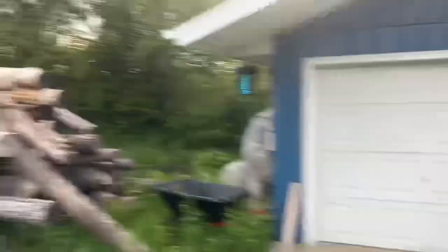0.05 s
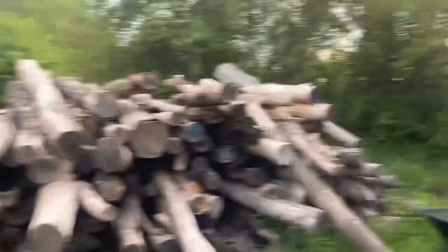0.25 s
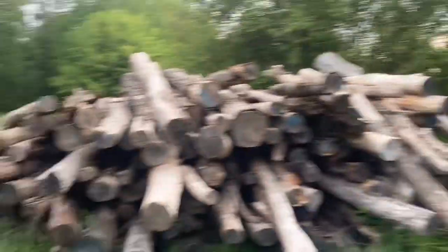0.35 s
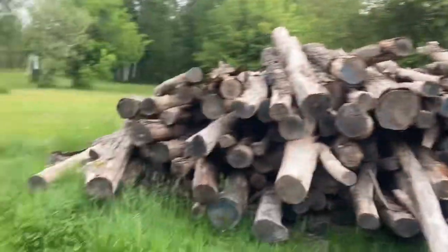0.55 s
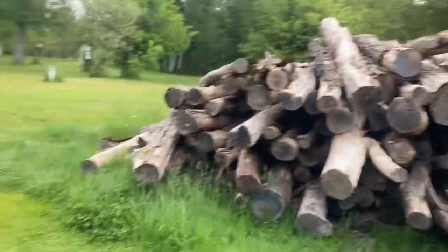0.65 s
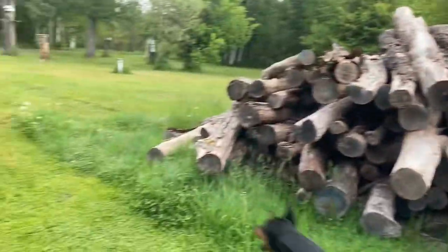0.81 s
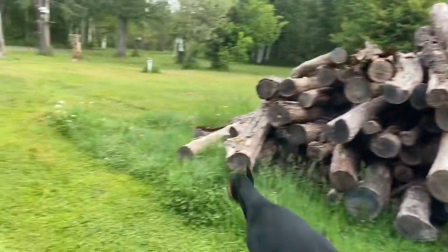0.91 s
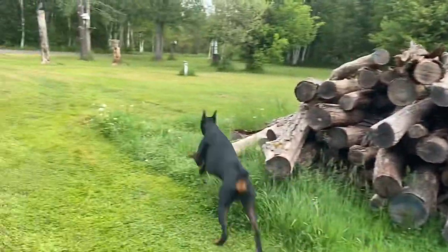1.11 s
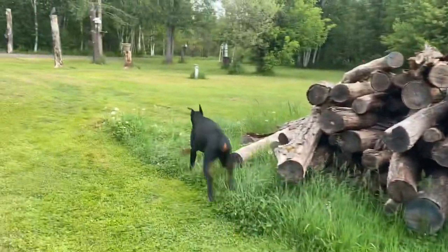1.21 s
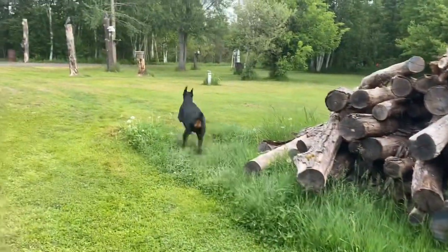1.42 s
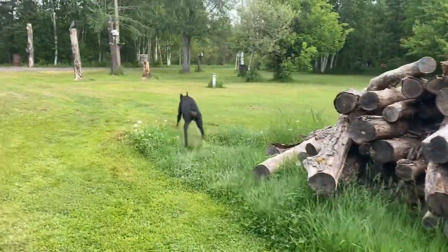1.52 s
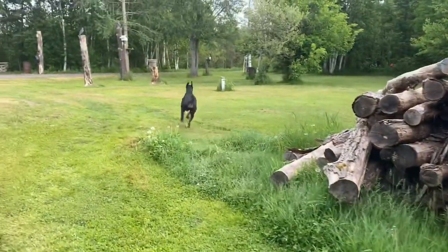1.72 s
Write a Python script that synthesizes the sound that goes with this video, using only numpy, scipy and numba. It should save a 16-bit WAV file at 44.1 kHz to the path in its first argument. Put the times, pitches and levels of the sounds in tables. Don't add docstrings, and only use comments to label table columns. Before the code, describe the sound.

A large dog's bark dominates: the faint, falling tail of an earlier one at 0-0.15 s, then one loud, raspy bark at 0.22-0.37 s, jumping up in pitch and dropping quickly, with a short wall and yard reflection. From 0.4 s, soft dull paw thuds, low landings, breath puffs and grass swishes, strongest near 0.9 s, fade by about 1.7 s over low wind rumble.

```python
import sys
import numpy as np
from scipy import signal
from scipy.fft import rfft, irfft, next_fast_len
from scipy.io import wavfile
from scipy.ndimage import uniform_filter1d
from numba import njit

SR = 44100
rng = np.random.default_rng(int(sys.argv[2]) if len(sys.argv) > 2 else 0)


def digitize_waveform(pressure):
    field = np.atleast_2d(pressure).T
    bounded = np.clip(field, -1, 1)
    quanta = np.round(bounded * 32767).astype(np.int16)
    wavfile.write(sys.argv[1], SR, quanta)


def volts(x):
    e = np.asarray(x, float) / 20
    return 10 ** e


N = 77175

# time_s, level_db, pitch_hz, chest_tone_db, mouth_resonance_hz
BARK_COURSE = [
    (.222, -32, 344.9, -39.5, 1790),
    (.236, -17.5, 371.2, -32.5, 1560),
    (.256, -14.5, 421.1, -36, 1583),
    (.272, -14.5, 416.9, -42.5, 1700),
    (.283, -17.5, 399.8, -48, 1684),
    (.292, -8.5, 364, -46, 1365),
    (.308, -17, 346.2, -40, 1380),
    (.332, -28.5, 273.4, -42, 1440),
    (.368, -53.5, 205, -49, 1442),
]
# centre_hz, width_hz, level_db
OPEN_THROAT = [(689, 193, 4.5), (1080, 300, -14), (1531, 90, -4.5), (1700, 174.2, -0.5), (2145, 390, -16.5)]
# centre_hz, width_hz, level_re_voice_db
BARK_RASP = [(400, 180, -12), (2050, 450, -24), (2900, 400, -38), (3900, 500, -47), (4750, 250, -33),
             (5700, 900, -41), (6850, 450, -38), (7900, 1100, -52)]


def bark():
    return voice(BARK_COURSE, OPEN_THROAT, rough=.2, teeth=BARK_RASP, rasp_db=7.0)


# time_s, level_db, pitch_hz, chest_tone_db, mouth_resonance_hz
EARLIER_COURSE = [
    (0.0, -38, 402.8, -35.5, 1020),
    (0.014, -37, 405.5, -34.5, 1100),
    (0.02, -42.5, 384, -45, 1100),
    (0.03, -40.5, 315, -49.5, 1150),
    (0.088, -44, 252.9, -40, 1170),
    (0.106, -52, 234.4, -57.5, 1160),
    (0.13, -54, 240, -64, 1190),
    (.2, -63.5, 242.5, -74.5, 1190),
]
# centre_hz, width_hz, level_db
CLOSING_THROAT = [(640, 110, 5.5), (990, 300, -1), (1540, 200, -9), (1160, 400, 0), (1850, 520, -14)]
# centre_hz, width_hz, level_re_voice_db
EARLIER_RASP_PEAKS = [(377, 60, -8.5), (2086, 440, -33.5), (3500, 840, -31), (4200, 500, -39.5),
                      (4816, 520, -36), (6200, 900, -42), (6700, 600, -39), (8500, 870, -45.5)]


def earlier_bark():
    return voice(EARLIER_COURSE, CLOSING_THROAT, rough=1.1, teeth=EARLIER_RASP_PEAKS, rasp_db=11.0)


# four corner times, time_s
DOUBLING_TIMES = (.231, .241, .281, .288)


def voice(course, throat, rough, teeth, rasp_db):
    jitter, muzzle_hz = .013, 2300
    weak_depth, weak_rest = .85, .08
    closing_tilt = .55
    rasp_slope = .73
    undertone_db = -10

    rows, t = np.array(course), np.arange(N) / SR
    db, hz, chest_db, mouth_hz = (np.interp(t, rows[:, 0], rows[:, k]) for k in range(1, 5))
    weak = weak_rest + (weak_depth - weak_rest) * np.interp(t, DOUBLING_TIMES, [0, 1, 1, 0])
    phase = np.pi * np.cumsum(hz * (1 + jitter * walk(150))) / SR

    k = np.arange(3, 30)[:, None]
    span = slice(0, int(.5 * SR))
    strength = np.where(k % 2, weak[span], 1)
    rolloff = 1 + (k * hz[span] / 2 / 2500) ** 8
    folds = np.zeros(N)
    folds[span] = (strength * np.cos(k * phase[span]) / rolloff).sum(0) / 4

    air = rng.standard_normal(N) * (1 + 0.21 * np.cos(phase))
    slack = np.clip(db.max() - 7 - db, 0, 30)
    drive = folds + rough * 2 * air * volts(slack)
    mouth = resonate(drive, throat[2:3], 0.94) + resonate(drive, throat[3:], mouth_hz / throat[3][0])
    x = resonate(drive, throat[:2], 0.99) + volts(-closing_tilt * slack) * mouth
    x = -signal.sosfilt(signal.butter(6, muzzle_hz, fs=SR, output="sos"), x)
    x /= np.sqrt(uniform_filter1d(x ** 2, 600) + 1e-9)

    rasp = volts(rasp_db + rasp_slope * db + 0.58 * walk(70)) * resonate(air, teeth, 0.95)
    chest = np.sin(2 * phase) + weak * volts(undertone_db) * np.sin(phase)
    x = x * volts(db) + np.sqrt(2) * volts(chest_db) * chest + rasp
    start, end = rows[0, 0], rows[-1, 0]
    return x * np.interp(t, [start - .003, start, end, end + 0.017], [0, 1, 1, 0])


# start_s,
# length_s, level_db, throat_ratio
HUFF_EVENTS = [(0.122, 0.12, -52, 1.22), (.4, .03, -78, 2.1), (0.512, 0.054, -51, 1.04),
               (0.525, 0.017, -53, 1.1), (0.706, 0.024, -59.5, 0.69), (0.822, 0.043, -63, 0.77),
               (0.876, 0.067, -60.5, 0.94), (1.038, 0.046, -66, 0.756), (1.186, 0.068, -59.5, 1),
               (1.243, 0.059, -65, 0.88), (1.363, 0.053, -70, 0.73)]
# centre_hz, width_hz, level_db
HUFF_PEAKS = [(470, 360, 5), (1170, 530, 1.5), (1900, 240, -12)]
# start_s, length_s, level_db
EXHALE_EVENTS = [
    (.214, 0.014, -62.5),
    (.295, 0.073, -55),
]
# centre_hz, width_hz, level_db
TEETH_PEAKS = [(2120, 600, 8), (3300, 1100, 2), (5595, 1800, -4), (8300, 920, -9)]


def huffs():
    air = rng.standard_normal(N) * volts(2.1 * walk(140))
    hiss = unit(resonate(air, TEETH_PEAKS, 1.))
    out = hiss * sum(volts(db) * swell(s, length) for s, length, db in EXHALE_EVENTS)
    for s, length, db, ratio in HUFF_EVENTS:
        out = out + volts(db) * swell(s, length) * unit(resonate(air, HUFF_PEAKS, ratio))
    return out


# start_s, peak_db, ring_hz, t60_s
PAW_THUDS = [(0.419, -43, 270, 0.023), (0.457, -52, 434, 0.066), (0.605, -45, 454, 0.02),
             (0.722, -52, 285, 0.035), (0.897, -34.5, 214.7, 0.015), (1.016, -48, 259, 0.035),
             (1.056, -47, 202, 0.021), (1.226, -45, 300, 0.024), (0.534, -57, 480, 0.023),
             (0.714, -52, 520, 0.012), (0.787, -54, 201.6, 0.034), (0.834, -62, 609, 0.032),
             (1.193, -64, 735, 0.025), (1.221, -48.5, 567, .03), (1.397, -60, 586, 0.024),
             (1.498, -65, 296, 0.029), (1.539, -59, 493, 0.025), (1.586, -62, 298, 0.058),
             (1.668, -61, 336, 0.022), (1.708, -67, 589, 0.022), (1.371, -46.5, 180, 0.023),
             (1.415, -56, 295.6, 0.03)]


def paws():
    out, t = np.zeros(N + 4096), np.arange(4096) / SR
    for s, db, hz, t60 in PAW_THUDS:
        decay = np.exp(-np.log(1000) * t / max(t60, .01)) * (1 - np.exp(-t / .0025))
        ring = (np.sin(2 * np.pi * hz * t) + .35 * np.sin(2 * np.pi * 2.5 * hz * t)) * decay
        tick = uniform_filter1d(rng.standard_normal(4096), size=20) * np.exp(-t / 0.0037)
        i = int(s * SR)
        out[i:i + 4096] += volts(db) * (3.0 * ring + 0.31 * tick)
    return out[:N]


# start_s, level_db, boom_hz, length_s
LANDING_BOOMS = [(0.114, -41, 85, 0.016), (0.222, -46, 65.7, 0.036), (0.399, -50, 59.57, 0.036),
                 (0.466, -58.5, 68, 0.052), (0.587, -49.5, 62.73, 0.066), (0.79, -48.5, 82, 0.039),
                 (0.984, -45, 75, 0.024), (1.058, -48.5, 88, 0.028), (1.212, -45.5, 61.6, 0.024),
                 (1.387, -59, 66.7, .03), (1.502, -52.5, 84.5, .04), (1.566, -51, 59.7, 0.054)]


def landings():
    t, out = np.arange(N) / SR, np.zeros(N)
    for s, db, hz, length in LANDING_BOOMS:
        out += volts(db) * uniform_filter1d(swell(s, length), size=300) * np.sin(2 * np.pi * hz * (t - s))
    return out


# start_s, length_s, high_register_db, low_register_db
GRASS_BRUSHES = [(.113, 0.016, -68, -74), (0.199, 0.0041, -69, -71), (.414, 0.0044, -62, -87.5),
                 (0.428, 0.0048, -67.5, -74), (0.475, 0.028, -72, -86), (0.514, 0.048, -73, -68.5),
                 (0.626, .005, -71, -80), (0.579, 0.016, -70.5, -69.5), (0.6, .012, -69, -67.5),
                 (0.606, 0.062, -77.5, -77), (0.701, 0.029, -74, -70), (0.799, 0.019, -78.5, -74),
                 (0.834, 0.027, -87.5, -78.5), (0.893, 0.0073, -70, -89), (0.997, 0.023, -83, -77),
                 (1.048, 0.039, -79, -78.5), (1.185, 0.048, -75, -71.5), (1.224, 0.015, -74.5, -72),
                 (1.236, 0.053, -79, -78), (1.304, 0.079, -82.5, -82), (1.387, 0.034, -78, -78),
                 (1.43, 0.096, -89, -85), (1.533, 0.015, -92, -87)]
# centre_hz, width_hz, level_db
LOW_BLADES = [(1870, 450, 3), (3400, 1000, -5)]
HIGH_BLADES = [(6330, 6000, 0)]


def grass():
    snaps = (rng.random(N) < 2500 / SR) * rng.standard_normal(N)
    snaps *= volts(1.5 * rng.exponential(size=N))
    x = (unit(snaps) + 1.5 * rng.standard_normal(N)) * volts(1.8 * walk(90))
    high = unit(resonate(x, HIGH_BLADES, 1.))
    low = unit(resonate(x, LOW_BLADES, 1.))
    return sum(swell(s, n) * (volts(hi_db) * high + volts(lo_db) * low) for s, n, hi_db, lo_db in GRASS_BRUSHES)


def reverberation(dog):
    yard = volts(-14) * tail(dog, t60=0.18)
    leaves = resonate(dog, [(2080, 700, 12.5)], 0.97)
    return yard + volts(-35) * tail(dog + leaves, t60=0.36)


def wall_echo(dog):
    return volts(-21) * np.roll(dog, int(.017 * SR))


# frequency_hz, density_db_per_hz
WIND_SPECTRUM = [(25, 4.5), (80, -5), (589, -25), (667, -21.5), (2530, -53), (3300, -48), (4200, -52.5),
                 (7870, -47.5), (9130, -55.5), (11900, -92.5)]


def wind():
    fade_db_per_s, hush_s, hush_db = -8.5, 1.53, -6
    out, gust, t = 0, walk(4.3), np.arange(N) / SR
    base = [colour(rng.standard_normal(N), WIND_SPECTRUM) for _ in range(2)]
    for hz in 35 * 2 ** np.arange(0, 8.1, .5):
        shared, apart = (svf(v, np.full(N, hz), hz / 0.94) for v in base)
        db = .9 * gust + 3.0 * walk(11)
        db += fade_db_per_s * min(hz / 500, 1) * (t - 1)
        db += (hz > 2000) * np.interp(t, [hush_s, hush_s + 0.072], [0, hush_db])
        out = out + volts(db) * np.array([shared, min(hz / 900, 1) * apart])
    return volts(-58) * unit(out)


def unit(x):
    return x / np.sqrt(np.mean(x ** 2))


@njit
def svf(x, hz, width):
    y, band, low = np.empty(len(x)), 0., 0.
    for i in range(len(x)):
        g, k = np.tan(np.pi * hz[i] / SR), width / hz[i]
        v = (band + g * (x[i] - low)) / (1 + g * (g + k))
        band, low, y[i] = 2 * v - band, low + 2 * g * v, k * v
    return y


def walk(rate):
    k = int(SR / rate)
    steps = np.repeat(rng.standard_normal(N // k + 1), k)
    return 1.3 * uniform_filter1d(uniform_filter1d(steps, k), k)[:N]


def colour(x, points):
    p, f = np.array(points), np.fft.rfftfreq(N, 1 / SR)
    return irfft(rfft(x) * volts(np.interp(np.log(f + 1), np.log(p[:, 0]), p[:, 1], right=-80)), N)


def resonate(x, peaks, ratio):
    move, out = ratio + np.zeros(N), 0
    for k, (hz, width, db) in enumerate(peaks):
        once = svf(x, hz * move, 1.245 * width)
        out = out + (-1) ** k * volts(db) * svf(once, hz * move, 1.245 * width)
    return out


def swell(start, length):
    return np.interp(np.arange(N) / SR, start + length * np.array([0, .25, .75, 1.25]), [0, 1, 1, 0])


def tail(x, t60):
    t = np.arange(int(t60 * SR)) / SR
    h = rng.standard_normal((2, len(t))) * np.exp(-np.log(1000) * t / t60) * np.minimum(t / 0.004, 1)
    h /= np.sqrt((h ** 2).sum(1, keepdims=True))
    return signal.fftconvolve(x[None], h, axes=1)[:, :N]


# frequency_hz, left_over_right_db
PORT_BALANCE = [(30, 3.5), (100, -.5), (180, -3.5), (310, -.5), (950, -1), (1650, 8.5), (2870, 8.5),
                (4990, 4.5), (6000, -7), (8000, -10.5)]


def ports(shared, apart):
    n = next_fast_len(N + 4096)
    f, p = np.fft.rfftfreq(n, 1 / SR), np.array(PORT_BALANCE)
    lag = np.interp(f, [1100, 2500], [0.00023, 0.000397])
    h = volts(np.interp(np.log(f + 1), np.log(p[:, 0]), p[:, 1]) / 2)
    bass_turn = 1 / (1 + (f / 111) ** 2)
    turn = np.exp(-2j * np.pi * f * lag - 1j * bass_turn)
    left = irfft(rfft(shared + apart, n) * h * turn, n)
    right = irfft(rfft(shared - apart, n) / h, n)
    return np.array([left, right])[:, :N]


def scene():
    dog = bark() + earlier_bark()
    yard, air, blades = reverberation(dog), wind(), grass()
    steps = paws() + landings()
    shared = dog + wall_echo(dog) + yard[0] + steps + huffs() + blades + air[0]
    apart = 0.9 * yard[1] + 1.1 * air[1] + 0.12 * np.roll(blades, 60)
    return ports(shared, apart)


def top_cut(x):
    return signal.sosfilt(signal.butter(12, 9280, fs=SR, output="sos"), x)


def record(dry):
    x = signal.sosfilt(signal.ellip(8, .3, 60, 8950, fs=SR, output="sos"), dry)
    x = signal.sosfilt(signal.butter(3, 42, "high", fs=SR, output="sos"), x)
    return top_cut(x)


dry = scene()
out = record(dry)
digitize_waveform(out)
```